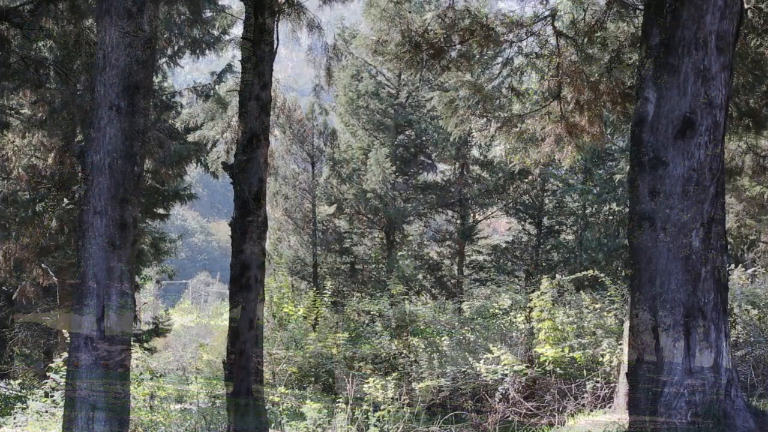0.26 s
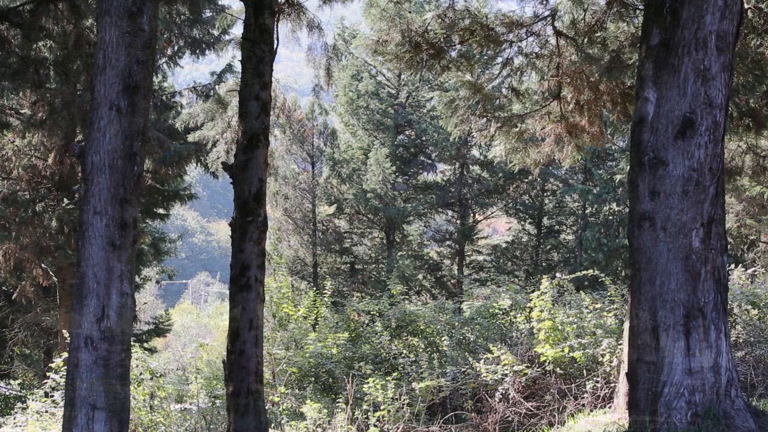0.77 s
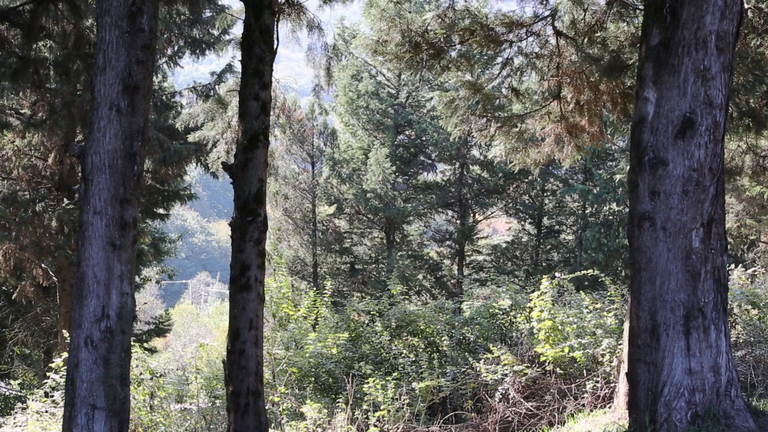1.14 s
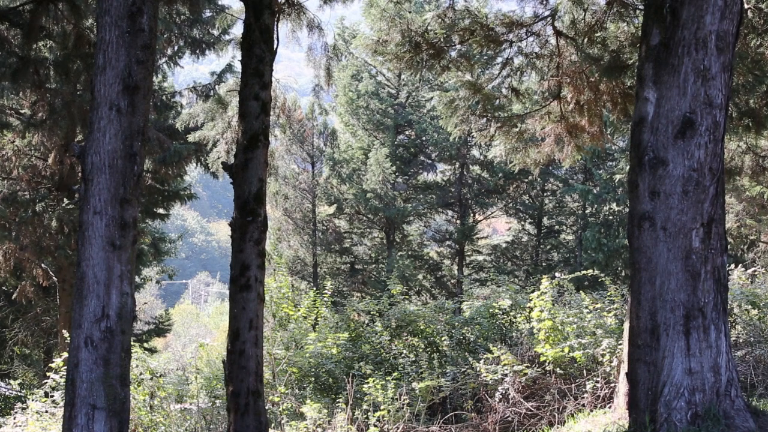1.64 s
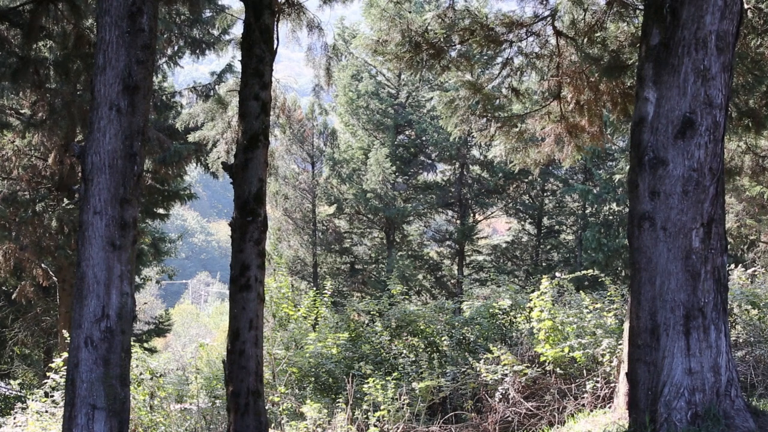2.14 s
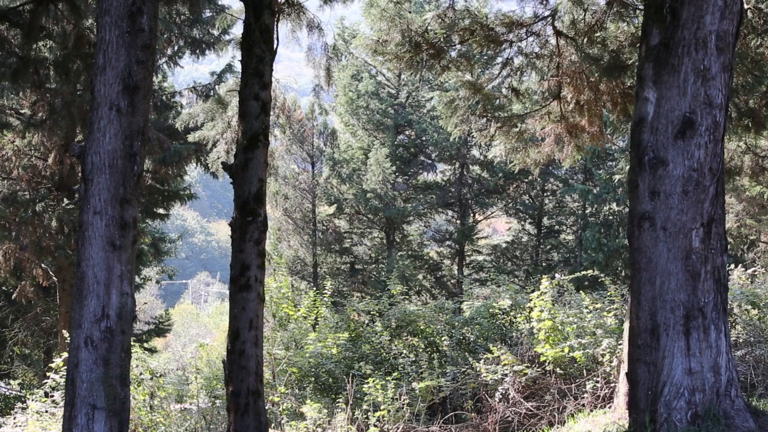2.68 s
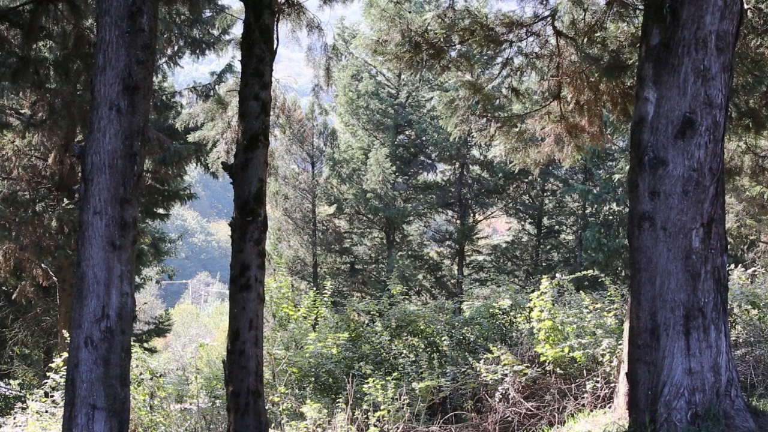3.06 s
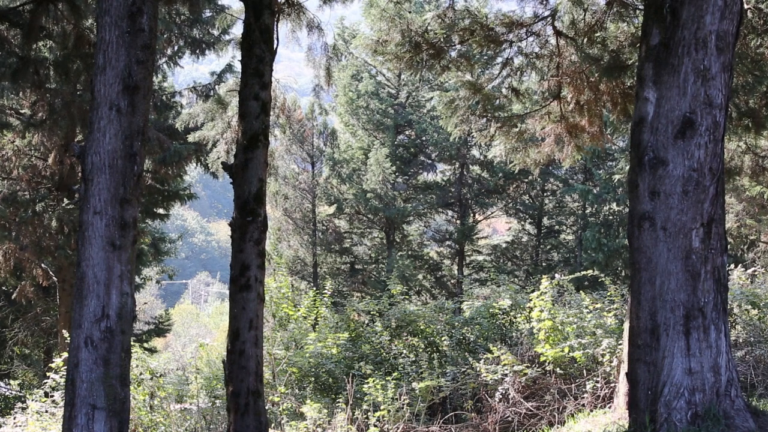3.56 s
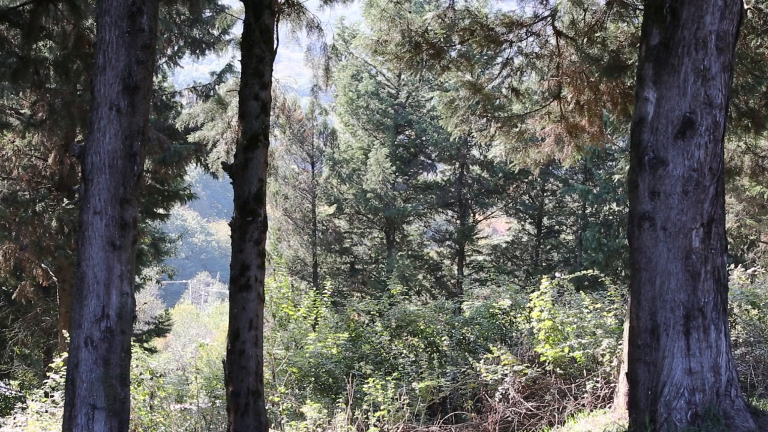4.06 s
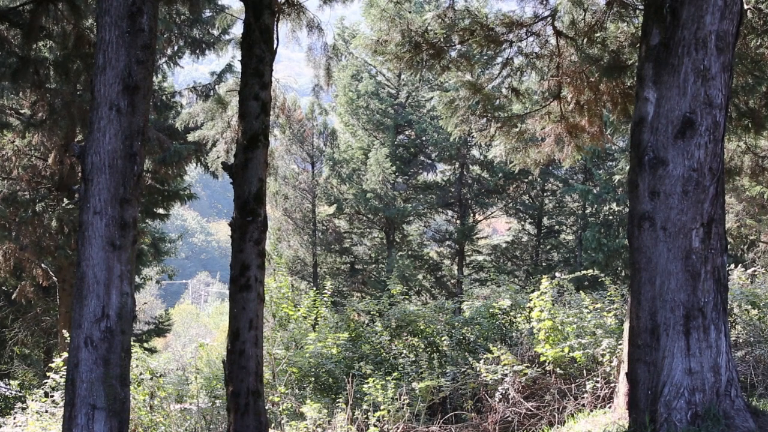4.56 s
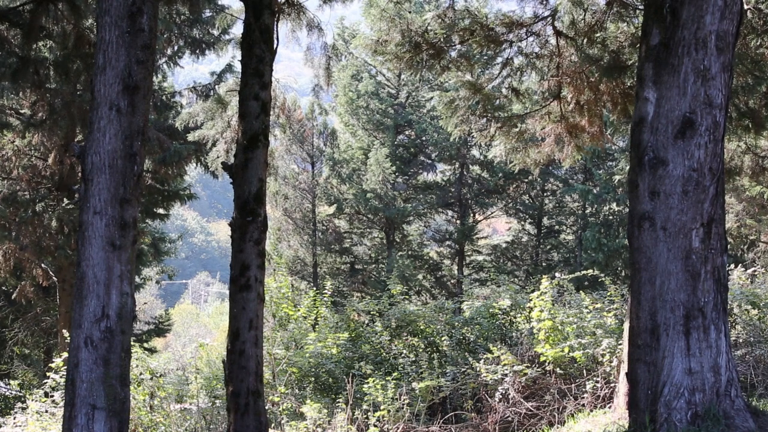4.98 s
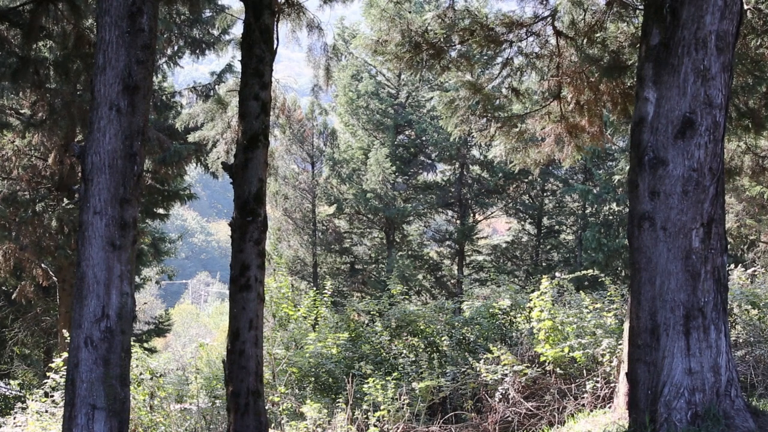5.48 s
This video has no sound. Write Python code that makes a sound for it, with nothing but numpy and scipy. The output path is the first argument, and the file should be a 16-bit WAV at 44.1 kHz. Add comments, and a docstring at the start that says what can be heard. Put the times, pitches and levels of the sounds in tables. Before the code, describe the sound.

Songbirds call at the edge of a conifer wood over soft hiss and a distant rumble. Small flicks and a harsh far call come first, then a loud high falling note and a rising whistle close by. After a dry click come thin calls overhead, a warble, quick chips, a burry falling phrase and a brief trill. Distant whistles and chips finish, all heard from one spot with short fluttering echoes.

```python
"""Songbirds at the edge of a conifer wood, heard from one spot in mono over soft hiss and distant rumble.
Small flicks and a harsh far call open; close by come a high slur and a rising whistle, with a tiny tick.
After a dry click at 2 s come thin calls in the crowns, a warble, chips, a burry fall and a quick trill.
Far whistles, chips and high slurs close as the rumble grows; faint rustles come and go throughout.
Most notes are nearly pure gliding syrinx tones; trunks and foliage scatter them into fluttering tails."""
import sys
import numpy as np
from scipy import signal
from scipy.fft import rfft, irfft
from scipy.io import wavfile
from scipy.ndimage import uniform_filter1d

SR = 44100
rng = np.random.default_rng(int(sys.argv[2]) if len(sys.argv) > 2 else 0)


def master(y):
    """Save y as 16-bit WAV."""
    cut = np.clip(np.atleast_2d(y).T, -1, 1)
    pcm = np.round(cut * 32767)  # scale
    wavfile.write(sys.argv[1], SR, pcm.astype(np.int16))


N = 252693
TIME = np.arange(N) / SR


def near_slur():
    """One loud, high note close to the microphone, sliding down."""
    # t/s, length/s, crest/share, glide/share, start f/Hz, goal f/Hz, level/dB
    notes = [(.811, 0.069, 0.5, 0.69, 8160, 6146, -10.5)]
    slur = sing(glides(notes, bend=1.19, swell=2.2, fade=.64), waver=.0041, overtone_db=-45)
    return wood(slur, echo_db=-12.5, tail_db=-11, t60=.93, twigs_db=-6.5, reach_s=.16)


def rising_whistle():
    """A near two-note whistle that climbs and grows louder, with a hoarse catch before each note."""
    # the course of the lower and the upper note: t/s, f/Hz, relative level/dB
    lower = [
        [(1.118, 2650, -36), (1.134, 2975, -30.5), (1.19, 2958, -35.5)],
    ]
    upper = [
        [(1.232, 3064, -32.5), (1.25, 3174, -25), (1.274, 3522, -20.5), (1.302, 3613, -21.5),
         (1.334, 3590, -10.5), (1.344, 3720, -31)],
    ]
    # the catches: t/s, length/s, crest/share, glide/share, start f/Hz, goal f/Hz, level/dB
    catches = [ (1.094, 0.024, 0.87, 0.91, 4850, 3440, -33), (1.207, 0.028, 0.74, 1, 3940, 3930, -25.5)]
    whistle = sing(lower + upper, waver=.0031, overtone_db=-64)
    out = undb(.5) * wood(whistle, echo_db=-6, tail_db=-9, t60=.37, twigs_db=-17)
    burrs = sing(glides(catches, swell=1.7, fade=.98),
                 waver=.021, warble_hz=293, warble_depth=.24, rasp=.068)
    return out + wood(burrs, echo_db=-7, tail_db=-9, t60=.2, twigs_db=-6.5)


def warbler():
    """Three joined notes nearby, down and then up, thrown back by a broad trunk."""
    # t/s, length/s, crest/share, glide/share, start f/Hz, goal f/Hz, level/dB
    notes = [(2.711, 0.077, 0.6, 0.4, 4200, 3665, -34.5), (2.788, 0.041, .7, 0.96, 3880, 4084, -33),
             (2.816, 0.0184, 0.43, 0.93, 4010, 5070, -24.5)]
    song = sing(glides(notes, bend=.91, swell=.77, fade=.97), waver=.0075, overtone_db=-55)
    return wood(big_trunk(song), echo_db=-12, tail_db=-6, t60=.55, twigs_db=-4.5)


def burry_fall():
    """A near falling phrase, made burry by a fast warble of pitch."""
    # t/s, length/s, crest/share, glide/share, start f/Hz, goal f/Hz, level/dB
    notes = [(3.392, .02, .6, 1, 4580, 4660, -34), (3.406, .067, .12, 0.97, 4593, 3960, -25),
             (3.466, .056, .35, 1, 3900, 3050, -33.5)]
    song = sing(glides(notes, swell=.58, fade=.58), waver=.012, warble_hz=103.3, warble_depth=.13)
    return wood(song, echo_db=-23, tail_db=-11.5, t60=.76, twigs_db=-2.5, reach_s=.55)


def near_chips():
    """Quick chips of near birds and a small bird's contact notes, each one flick of pitch."""
    # mostly falling chips: t/s, length/s, start f/Hz, end f/Hz, level/dB
    chips = [ (2.281, 0.0076, 7450, 6250, -30), (2.311, 0.0094, 6870, 6880, -33),
             (2.447, 0.011, 7350, 6280, -29.5), (2.878, 0.0118, 6020, 4210, -19.5),
             (2.937, 0.0078, 6210, 4700, -19.5), (3.003, 0.0079, 6260, 4010, -20),
             (3.071, .008, 5540, 4680, -23.5)]
    # contact notes flicked downwards and upwards: t/s, level/dB
    downs = [(.229, -41.5), (.288, -34), (.348, -40), (.424, -45)]
    ups = [(.233, -43.5), (.292, -49), (.434, -48.5), (3.273, -46), (3.461, -45.5), (3.584, -47.5),
           (3.731, -46.5)]
    down, up = (.005, 6350, 4930), (.0077, 5900, 7650)  # length/s, start f/Hz, end f/Hz
    flicks = [(s, *down, db) for s, db in downs] + [(s, *up, db) for s, db in ups]
    calls = big_trunk(sweeps(chips, bend=1)) + sweeps(flicks, bend=1.01)
    return wood(calls, echo_db=-12, tail_db=-12.5, t60=.38, twigs_db=-5.5, reach_s=.19, trunk_count=12)


def trill():
    """One high note nearby, its pitch swung widely into a quick trill."""
    # t/s, length/s, crest/share, glide/share, start f/Hz, goal f/Hz, level/dB
    notes = [(4.087, 0.091, 0.5, 0.97, 7100, 6730, -36.5)]
    song = sing(glides(notes, swell=.8, fade=.48), waver=.0136, warble_hz=56, warble_depth=.2)
    return wood(song, echo_db=-7.5, tail_db=-11, t60=.21, twigs_db=-3)


def crown_birds():
    """Small birds with thin voices, high above the microphone."""
    # short calls, long slurs: t/s, length/s, crest/share, glide/share, start f/Hz, goal f/Hz, level/dB
    thin_calls = [ (2.203, 0.023, .42, 1, 8340, 7750, -47.5), (2.228, .012, .45, 1, 7330, 7250, -37),
                  (2.238, 0.091, 0.28, 1, 7980, 7900, -39.5), (2.311, 0.017, .3, 1, 8050, 7820, -36),
                  (2.395, 0.023, .35, 0.72, 8060, 7800, -42), (2.424, .024, .4, 1, 7500, 7420, -37),
                  (2.45, 0.086, .3, 1, 7470, 7524, -33.5), (3.176, 0.032, 0.87, 1, 9300, 8670, -39),
                  (3.212, 0.058, .65, 0.96, 8750, 8480, -38.5), (3.208, .076, 0.34, 1, 7950, 7640, -43)]
    long_slurs = [ (.03, 0.21, .35, 0.88, 8450, 7270, -61), (2.215, .1, .42, 0.84, 9000, 8550, -59),
                  (3.72, .15, .42, 0.92, 8430, 8060, -63), (3.92, 0.1, .55, 0.78, 8300, 8150, -70),
                  (4.255, .07, .3, 1, 8800, 8450, -69), (4.68, .055, 0.51, 1, 6530, 6300, -63),
                  (4.69, .045, .55, 1, 5800, 5450, -64), (4.85, .34, 0.45, 1, 8740, 7160, -43.5),
                  (5.55, 0.19, .48, 1, 8530, 7450, -60.5)]
    calls = sing(glides(thin_calls, fade=.67), waver=.0113, rasp=.0086)
    out = undb(-.1) * wood(calls, echo_db=-6, tail_db=-6.5, t60=.32, twigs_db=-4)
    slurs = sing(glides(long_slurs, bend=1.15, swell=.39, fade=.85), waver=.0045)
    return out + wood(slurs, echo_db=-4, tail_db=-7.5, t60=.56, twigs_db=-1.5)


def harsh_call():
    """A bird further off sounds both sides of its syrinx at once, the second more roughly."""
    # each side: t/s, length/s, crest/share, glide/share, start f/Hz, goal f/Hz, relative level/dB
    first_side = [(.43, 0.103, 0.3, .42, 2488, 2172, -31.5), (.525, 0.133, 0.47, 1, 2333, 2188, -34)]
    second_side = [ (.432, 0.11, 0.33, 0.93, 2713, 2620, -38.5), (.552, 0.13, .45, 0.97, 2776, 2397, -32.5),
                   (.675, .025, .4, 1, 2410, 2334, -36.5)]
    call = sing(glides(first_side, bend=1.3, swell=1.1, fade=1.1), waver=.005, overtone_db=-15, rasp=.011)
    call += sing(glides(second_side),
                 waver=.009, overtone_db=-36, warble_hz=380, warble_depth=.15, rasp=.015)
    hoarse_db = np.interp(TIME, [.42, .48, .6, .66, .72], [-100, -58.5, -44.5, -50.5, -100])
    call += band_noise(2400, 3800) * undb(hoarse_db)
    return undb(-1) * wood(call, echo_db=-7.5, tail_db=-8.5, t60=.6, twigs_db=-19.5, reach_s=.115)


def far_birds():
    """Whistles, low pips, hoarse twitter and hooked chips carry through the trees from deep in the wood."""
    # all four: t/s, length/s, crest/share, glide/share, start f/Hz, goal f/Hz, level/dB
    far_whistles = [ (3.93, 0.13, 0.45, 1, 4430, 4290, -58), (4.12, .14, 0.97, 0.95, 3430, 3350, -58.5),
                    (4.443, 0.055, 0.42, 1, 3510, 3470, -45), (4.82, .18, .22, 1, 5110, 5060, -59.5),
                    (5.04, .1, .42, 1, 6470, 6500, -63), (5.06, .07, 0.33, 1, 3200, 3090, -60),
                    (5.269, 0.0275, 0.42, .55, 2950, 3340, -45), (5.28, .085, 0.65, .42, 2305, 4020, -37),
                    (5.345, .15, .25, 0.93, 4060, 4160, -42), (5.485, .1, 0.24, 1, 4140, 4066, -46),
                    (5.35, 0.14, 0.73, 0.92, 3060, 2870, -52)]
    low_pips = [ (2.362, 0.034, 0.26, 0.79, 830, 690, -49.5), (3.272, 0.028, 0.41, 1, 1357, 1346, -48.5),
                (3.465, .04, 0.36, 0.9, 1427, 1300, -53), (3.655, 0.031, .4, 1, 1375, 1340, -53.5)]
    far_twitter = [ (3.57, .19, .62, 0.96, 4180, 4350, -49), (4.255, 0.064, .4, 0.96, 4150, 4380, -52),
                   (4.35, 0.032, .45, 1, 4200, 4300, -58), (4.535, 0.05, 0.91, 1, 4430, 3500, -50),
                   (4.95, 0.037, .7, 0.8, 4400, 3600, -60)]
    far_chips = [(4.391, 0.027, 0.57, 0.88, 4200, 2810, -46), (4.487, 0.037, 0.18, 0.78, 4100, 2776, -39),
                 (4.61, 0.026, 0.5, 1, 4700, 2590, -41), (4.736, 0.025, 0.33, 0.95, 4600, 2600, -42)]
    whistles = sing(glides(far_whistles, bend=.85, swell=.82, fade=1.2), waver=.0077)
    pips = sing(glides(low_pips, swell=1.2), waver=.011)
    out = wood(whistles + pips, echo_db=-8.5, tail_db=-2, t60=.61)
    twitter = sing(glides(far_twitter, swell=.9), waver=.042, rasp=.031)
    out += wood(twitter, echo_db=-12.5, tail_db=-8, t60=.54)
    chips = sing(glides(far_chips, bend=1.6, swell=.66, fade=.73), waver=.0206, rasp=.014)
    return out + wood(chips, echo_db=-5.5, tail_db=-2, t60=.58, twigs_db=-3)


def glides(rows, bend=1, swell=1, fade=1, count=48):
    """Each note swells to its crest and dies away as its pitch glides to a goal: (t/s, f/Hz, level/dB)."""
    u = (np.arange(count) + .5) / count  # share of the note's length, as are crest and glide
    notes = []
    for s, length, crest, glide, start_hz, goal_hz, db in rows:
        pitch = goal_hz + (start_hz - goal_hz) * np.maximum(1 - u / glide, 0) ** bend
        progress = np.interp(u, [0, np.clip(crest, u[0], u[-1]), 1], [0, .5, 1])
        push = np.sin(np.pi * progress) ** np.where(u < crest, swell, fade)  # higher powers: softer ends
        notes.append(list(zip(s + length * u, pitch, db + 20 * np.log10(push))))
    return notes


def sing(notes, waver, overtone_db=-50, warble_hz=100, warble_depth=0, rasp=0):
    """A syrinx tone follows each note's pitch and level; muscles add drift, arched warbles and a rasp."""
    out = np.zeros(N)
    drift, grit = waver * walk(170), rasp * walk(1500)
    loudest = undb(max(db for note in notes for _, _, db in note))
    for note in notes:
        s, hz, db = np.transpose(sorted(note))
        span = (TIME > s[0] - .003) & (TIME < s[-1] + .003)
        t = TIME[span]
        gate = np.sin(np.pi / 2 * np.clip(np.minimum(t - t[0], t[-1] - t) / .005, 0, 1)) ** 2
        arch = np.abs(np.sin(np.pi * warble_hz * (t - t[0]))) - 2 / np.pi  # round tops, sharp dips
        gain = undb(np.interp(t, s, db))
        effort = np.sqrt(gain / loudest)  # the warble deepens as the bird pushes harder
        pitch = uniform_filter1d(np.interp(t, s, hz), size=128)
        pitch *= 1 + drift[span] + warble_depth * effort * arch + grit[span]
        phase = 2 * np.pi * np.cumsum(pitch) / SR
        out[span] += gate * gain * (np.sin(phase) + undb(overtone_db) * np.sin(2 * phase))
    return out


def sweeps(rows, bend):
    """Very short pure tones that sweep in pitch, in a straight line when `bend` is 1."""
    out = np.zeros(N)
    for s, length, start_hz, end_hz, db in rows:
        u = np.linspace(0, 1, int(length * SR))
        pitch = end_hz + (start_hz - end_hz) * (1 - u) ** bend
        at = int(s * SR)
        out[at:at + len(u)] += undb(db) * np.sin(np.pi * u) * np.sin(2 * np.pi * np.cumsum(pitch) / SR)
    return out


def wood(x, echo_db, tail_db, t60, twigs_db=-12, reach_s=.36, trunk_count=24):
    """Direct sound, scatter from twigs at the perch, echoes from trunks and a diffuse tail from foliage."""
    t = TIME[:SR // 2]
    fade = undb(-60 * t / t60) / np.sqrt(1 + (t / reach_s) ** 6)  # sound escapes beyond the trees' reach
    trunks = np.zeros(len(t))
    delay, size = rng.random((trunk_count, 2)).T
    lags = (.012 + .16 * (np.arange(trunk_count) + delay) / trunk_count) * SR
    trunks[lags.astype(int)] = np.sign(size - .5) * (.5 + size)
    twigs = rng.standard_normal(len(t)) * t * np.exp(-t / .0043)
    foliage = rng.standard_normal(len(t)) * fade * (1 - np.exp(-t / .012))
    response = undb(twigs_db) * unit(twigs) + undb(echo_db) * unit(trunks * fade)
    response += undb(tail_db) * unit(foliage)
    return x + signal.oaconvolve(x, response / np.sqrt(len(t)))[:N]


def big_trunk(x, delay_s=.0245, echo_db=-12.5):
    """Direct sound and its echo from one broad trunk."""
    return x + undb(echo_db) * np.concatenate([np.zeros(int(delay_s * SR)), x])[:N]


def click(at_s=2.1203, peak_db=-18):
    """One dry click close to the microphone, dead within a few milliseconds."""
    # heavily damped modes: delay/s, f/Hz, t60/s, relative level/dB
    modes = [(0, 2100, 0.004, 8.5), (.0003, 976, 0.0055, 6), (.0016, 430, .009, -3)]
    out = np.zeros(N)
    for delay, hz, t60, db in modes:
        t = np.maximum(TIME - at_s - delay, 0)
        contact = 1 - np.exp(-(t / .00035) ** 2)
        out -= undb(db) * contact * np.exp(-np.log(1000) * t / t60) * np.sin(2 * np.pi * hz * t)
    return undb(peak_db) * out / np.abs(out).max()


def tick(at_s=1.1715, level_db=-33):
    """A tiny bright tick, as of a dry needle dropping."""
    t = TIME - at_s
    return undb(level_db) * (t > 0) * np.exp(-np.abs(t) / .00049) * band_noise(700, 7000)


def rustles():
    """Soft stirrings in the undergrowth: brief, uneven scuffs of noise."""
    # t/s, length/s, centre f/Hz, level/dB
    scuffs = [(.519, 0.1, 840, -51), (1.109, .075, 900, -54.5), (3.31, .014, 810, -54),
              (4.637, .045, 940, -49), (4.637, .06, 215, -46), (4.638, 0.14, 550, -53)]
    out, grain = np.zeros(N), 1 + .5 * np.tanh(walk(120))
    for s, length, hz, db in scuffs:
        swell = np.sin(np.pi * np.sqrt(np.clip((TIME - s) / length, 0, 1)))
        out += undb(db) * swell * grain * band_noise(hz / np.sqrt(2), hz * np.sqrt(2))
    return out


def air(hiss_db=-49.5):
    """A smooth hiss over a distant rumble that wanders and grows towards the end."""
    # spectrum of the wood's quiet: f/Hz, relative level/dB
    spectrum = [(25, -23), (36, -21), (52, -9), (100, -5.5), (138, -1.5), (210, -7.5), (295, -9),
                (380, -14), (600, -17), (1250, -18), (1700, -19.5), (4000, -22.5), (8000, -29),
                (15500, -35)]
    hz, db = np.transpose(spectrum)
    bins = np.maximum(np.arange(N // 2 + 1) * SR / N, 1)
    colour = undb(np.interp(np.log(bins), np.log(hz), db)) * np.minimum(bins / hz[0], 1)
    hiss = unit(irfft(rfft(rng.standard_normal(N)) * colour, N))
    rumble_db = np.interp(TIME, [0, 4.4, 5.6], [-63, -62, -55])
    rumble = band_noise(129.4, 158.6) * undb(rumble_db + 2 * walk(1.9))
    return hiss * undb(hiss_db + .46 * walk(2.59)) + rumble


def undb(db):
    """Decibels to gain."""
    return 10 ** (np.asarray(db) / 20)


def unit(x):
    """Scale to rms 1."""
    return x / np.sqrt(np.mean(x ** 2))


def walk(rate):
    """Smooth random drift with about `rate` turns a second, spread 1."""
    count = int(SR / rate) + 1
    steps = np.repeat(rng.standard_normal(N // count + 1), count)
    return unit(uniform_filter1d(uniform_filter1d(steps, count), count)[:N])


def band_noise(lo_hz, hi_hz):
    """Noise between two soft edges, rms 1."""
    band = signal.butter(2, [lo_hz, hi_hz], "band", fs=SR, output="sos")
    return unit(signal.sosfilt(band, rng.standard_normal(N)))


def scene():
    """Birds near, overhead and far over the quiet of the wood, at one microphone."""
    quiet = air()
    near = near_slur() + rising_whistle() + warbler() + burry_fall() + near_chips() + trill()
    further = crown_birds() + harsh_call() + far_birds()
    return (quiet + near + further + click() + tick() + rustles())[None]


def record(dry, top_hz=15800):
    """The recorder cuts the very top."""
    return signal.sosfilt(signal.ellip(10, .1, 80, top_hz, fs=SR, output="sos"), dry)


dry = scene()
out = record(dry)
master(out)
```